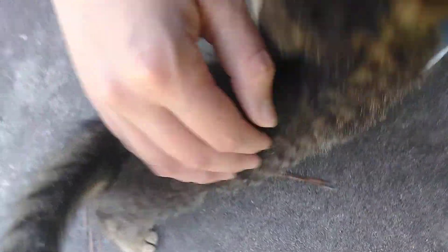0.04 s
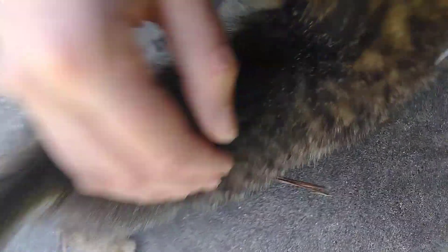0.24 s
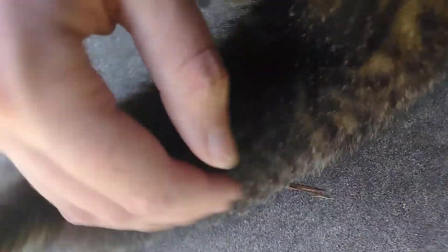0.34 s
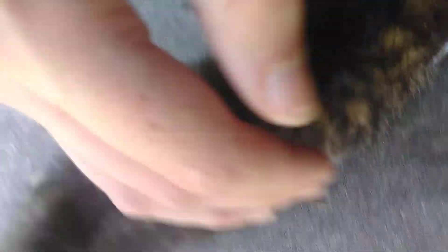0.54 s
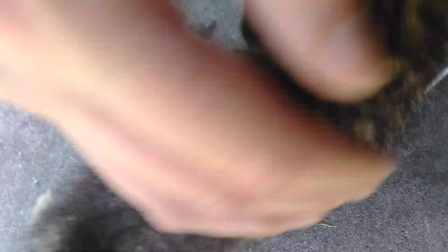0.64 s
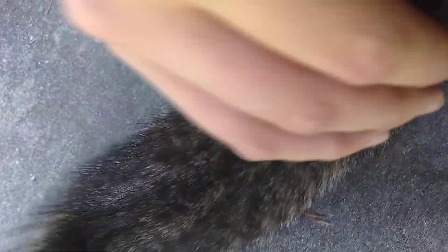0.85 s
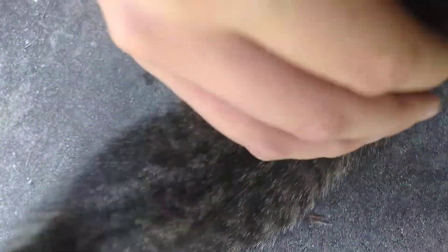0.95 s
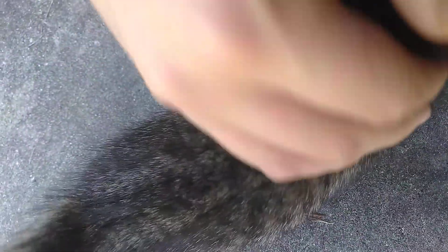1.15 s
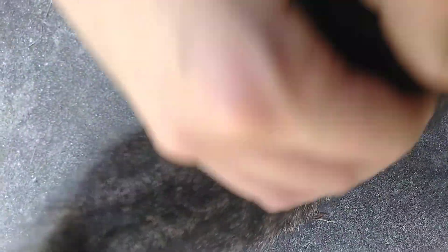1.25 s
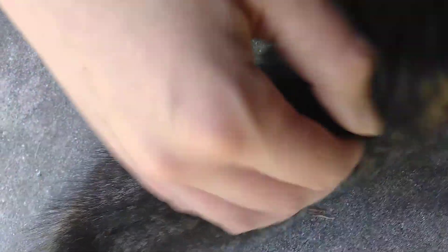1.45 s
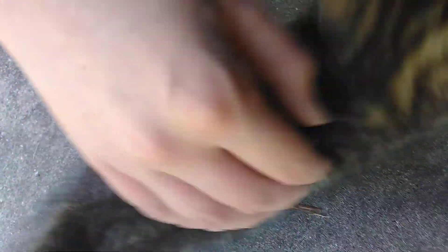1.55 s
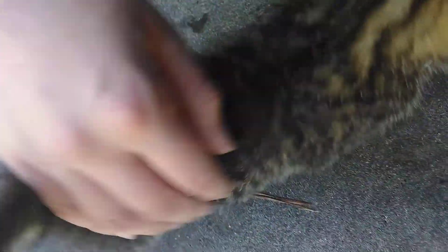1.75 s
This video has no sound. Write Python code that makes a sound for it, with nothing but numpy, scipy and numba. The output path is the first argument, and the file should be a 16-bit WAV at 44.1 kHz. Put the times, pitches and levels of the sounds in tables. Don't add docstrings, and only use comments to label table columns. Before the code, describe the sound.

Fur rubbed by fingers, dry and close, bursts into hissing and sharp ticks in the first half, fades out, then returns as light pats and small handling bumps, with quiet breeze and distant rumble behind.

```python
import sys
import numpy as np
from scipy import signal
from scipy.io import wavfile
from scipy.ndimage import uniform_filter1d
from numba import njit

SR = 44100
rng = np.random.default_rng(int(sys.argv[2]) if len(sys.argv) > 2 else 0)


def volts_from_decibels(level):
    exponent = np.asarray(level, float) / 20
    return 10 ** exponent


def store_wav(level_fs):
    pcm = np.round(np.clip(np.atleast_2d(level_fs), -1, 1) * 32767)
    wavfile.write(sys.argv[1], SR, pcm.T.astype(np.int16))


N = 79380
TOP_HZ = 15800


def level(x, db):
    return x * volts_from_decibels(db) / np.sqrt(np.mean(x ** 2))


@njit
def svf(x, hz, width):
    y, band_state, low_state = np.empty(len(x)), 0., 0.
    for i in range(len(x)):
        g = np.tan(np.pi * hz[i] / SR)
        damping = 2 * np.pi * width / SR / np.sin(2 * np.pi * hz[i] / SR)
        v = (band_state + g * (x[i] - low_state)) / (1 + g * (g + damping))
        band_state = 2 * v - band_state
        low_state = low_state + 2 * g * v
        y[i] = damping * v
    return y


def band(x, hz, width, order=2):
    centre = np.clip(hz * np.ones(N), 10, .45 * SR)
    for _ in range(order):
        x = svf(x + 1e-18, centre, 1. * width)
    return x


def walk(rate):
    hold = int(SR / rate)
    steps = np.repeat(rng.standard_normal(N // hold + 1), hold)
    return 1.3 * uniform_filter1d(uniform_filter1d(steps, hold), hold)[:N]


def grains(per_s, scatter_db):
    hit = rng.random(N) < per_s / SR
    size = np.minimum(rng.exponential(size=N), 3)
    return level(hit * rng.standard_normal(N) * volts_from_decibels(scatter_db * size), 0)


def resonate(x, table, drift, patchy_db, rate, tilt_db=0):
    mid = np.sqrt(table[2][0] * table[-1][0]) if len(table) > 2 else 1
    total, power = 0, 0
    for f, width, db in table:
        gain = volts_from_decibels(db + tilt_db * np.log2(f / mid)) * np.sqrt(width)
        flicker = volts_from_decibels(patchy_db * walk(rate))
        excitation = x * np.sign(rng.standard_normal(N))
        ring = level(band(excitation, f * (1 + drift * walk(12)), 1.5 * width), 0)
        total = total + gain * flicker * ring
        power = power + gain ** 2
    return total / np.sqrt(power)


def air():
    # f/Hz, density/dB per Hz
    air_spectrum = [(21, -30), (35, 2.5), (101, -1), (539, -19), (656, -34.5), (997, -26), (2800, -36.5),
                    (5600, -44.5), (10900, -37.5), (12600, -38.5), (16400, -40.5)]
    f, density_db = np.array(air_spectrum, float).T
    out, swell = 0, walk(3.1)
    for hz in 38 * 2 ** np.arange(0, 9, .5):
        db = np.interp(np.log(hz), np.log(f), density_db) + 0.33 * swell + 1.41 * walk(8)
        out = out + volts_from_decibels(db) * band(rng.standard_normal(N), hz, hz / 1.7)
    low_pass = signal.butter(6, 16000, fs=SR, output="sos")
    return level(signal.sosfilt(low_pass, out), -61)


def breeze():
    # t/s, level/dB
    gusts = [(0, -75), (0.701, -72), (0.85, -75), (1.0, -87), (1.06, -71.5), (1.14, -70), (1.2, -82),
             (1.29, -60.5), (1.42, -79), (1.52, -71.5), (1.6, -90), (1.718, -76)]
    leaves_from_s, leaves_db = 1.18, -83
    s, db = np.array(gusts, float).T
    t = np.arange(N) / SR
    puff = level(band(rng.standard_normal(N), 340 * 2 ** (.15 * walk(12)), 380), 0)
    leaves = level(band(rng.standard_normal(N), 11500, 6000), leaves_db)
    leaves = leaves * np.clip((t - leaves_from_s) / .5, 0, 1)
    return puff * volts_from_decibels(np.interp(t, s, db) + 2.0 * walk(8.1)) + leaves


def hand():
    # t/s, grip on the shell/dB, slip of the fur/dB, coarseness of the slip/dB, grip brightness/dB per octave
    reach = [
        (0, -69.5, -83, -4, -8.5),
        (.056, -78, -83, -2, -5.5),
        (.078, -66, -78, -6, 0),
        (.086, -54, -72, -8, 1),
        (.104, -71, -72, -14, 1.5),
        (.13, -65, -66, -16, 1.5),
        (.157, -59, -58, -14, 1.5),
        (.160, -46, -54, -14, 0),
        (.19, -47.5, -51, -10, -1),
        (.215, -46.5, -54, -3, 2.5),
    ]
    first_stroke = [
        (0.215, -39.5, -57, -1, 0.084),
        (0.24, -41.5, -44.5, -0.9, 0.087),
        (0.268, -39, -38, -0.85, 0.001),
        (0.293, -35.5, -36, -0.78, 0),
        (0.309, -39, -31.5, -1.7, 0),
        (0.33, -46.5, -47.5, -1.2, 0.0056),
    ]
    second_stroke = [
        (0.33, -49.5, -47, -8, -9.5),
        (0.345, -37, -45.5, 1, -2),
        (0.358, -48.5, -52, 0.5, 1),
        (0.378, -33, -51, 7, -2.8),
        (0.412, -57.5, -55.5, -3, 5),
        (0.421, -47.5, -53, 2, 7.5),
        (0.436, -58, -63.5, -4, 0),
        (.447, -64, -65.5, 2, -10),
    ]
    return_stroke = [
        (0.456, -62, -62, -7, 0.3),
        (0.47, -59.5, -60, -7, 0.45),
        (0.484, -50, -54.5, 0, 0.35),
        (0.498, -61, -61, -3.5, 0.3),
        (0.534, -51, -52.5, 1, 0.12),
        (0.555, -58, -49, -15, -0.17),
        (.564, -44.5, -45, 0, -1),
        (0.569, -39.5, -44.5, 1.5, -0.26),
        (0.6, -47, -53.5, 3, -0.45),
    ]
    lift = [
        (0.6, -48.5, -54.5, 1, 0),
        (0.646, -50.5, -59, -1.5, 0),
        (0.69, -72.5, -62, -12, 0),
        (0.757, -72.5, -74, -3.5, 0),
        (0.794, -77.5, -87, 4, 0.0038),
        (0.8, -81, -97, -6, 0),
    ]
    shift = [
        (0.84, -77.5, -92.5, -3, 3),
        (0.866, -81, -86.5, -2.5, 4),
        (.874, -73, -75.5, -0.5, 4.5),
        (0.898, -65.5, -77.5, 2, 5),
        (.907, -80, -75.5, -1, 3),
        (0.96, -98, -98, -10, 2.9),
    ]
    pat = [
        (1.03, -95, -99.5, 4.5, 4),
        (1.056, -85, -81, -9, 5.4),
        (1.062, -79, -70, -9, 5.9),
        (1.075, -73, -62, -21.5, 8.3),
        (1.095, -71.5, -56, -23, 7.3),
        (1.12, -70, -56, -14, 3.1),
        (1.16, -76, -60, -9.5, 3),
        (1.194, -78, -66, -13, 2.3),
        (1.2, -80, -70, -18, 3),
        (1.225, -85, -78, -18, 3),
    ]
    pat_back = [
        (1.226, -91, -80, -12, 3),
        (1.243, -68.5, -70, 0.5, 4),
        (1.26, -62.5, -59.5, -3, 9.9),
        (1.285, -57, -56.5, -13, 4),
        (1.296, -64.5, -59, -8, 4.5),
        (1.308, -60.5, -59.5, -8, 4.4),
        (1.33, -69.5, -66, -9, 2),
        (1.384, -89, -79, -18, 3),
    ]
    settle = [
        (1.385, -74, -79.5, -28, 3),
        (1.415, -71, -77, -1.5, 3.5),
        (1.424, -63, -80, 8, 5),
        (1.439, -62.5, -81.5, 0, 6.1),
        (1.458, -65.5, -79, -9.5, 5.2),
        (1.489, -68.5, -83, -20, 15),
        (1.521, -72, -88.5, -7, 4.7),
        (1.58, -93, -100, -17.5, 5.7),
    ]
    moves = np.vstack([reach, first_stroke, second_stroke, return_stroke, lift, shift, pat, pat_back, settle])
    moves = moves[np.argsort(moves[:, 0], kind="stable")]
    t = np.arange(N) / SR
    return [uniform_filter1d(np.interp(t, moves[:, 0], control), size=90) for control in moves.T[1:]]


def grip(grip_db, bright_db):
    # f/Hz, width/Hz, level/dB
    shell = [(324, 330, -27.5), (470, 85, -12), (754, 290, 2), (1118.5, 150, 3.5), (1500, 1000, -0.5),
             (2100, 500, -1), (2743, 1300, -9.5)]
    # t/s, peak level/dB, f/Hz, t60/s
    knocks = [(.002, -56, 482, 0.083), (0.061, -61, 1500, .01), (.0858, -43, 680, 0.026),
              (.139, -51.5, 1990, 0.017), (.229, -37.5, 1080, .015), (.2405, -32, 2190, 0.028),
              (.2545, -34, 580, 0.038), (0.566, -37, 1740, .015), (.885, -65, 2100, 0.066),
              (0.896, -57, 6800, 0.011), (.901, -62, 7200, 0.013), (1.085, -63.5, 2410, .025),
              (1.1, -54, 5800, 0.016), (1.122, -56.5, 2276, .035), (1.125, -58, 3800, 0.024),
              (1.282, -53, 1080, 0.083), (1.746, -75.5, 10500, .12), (0.196, -49, 1140, 0.03),
              (0.225, -43.5, 80, 0.1), (0.249, -56, 1380, 0.013), (0.373, -41, 366, 0.03),
              (.648, -32, 650, 0.0092), (1.361, -52, 188.5, 0.14), (1.424, -53, 1200, 0.021),
              (1.679, -53.5, 190.4, 0.15), (1.701, -66.5, 1500, 0.024), (1.742, -46, 287, 0.018),
              (1.744, -60, 1810, 0.006)]
    slips = grains(per_s=5000, scatter_db=3)
    creak = resonate(slips, shell, drift=.06, patchy_db=1.5, rate=70, tilt_db=bright_db)
    creak = signal.sosfilt(signal.butter(10, 3400, fs=SR, output="sos"), creak)
    creak = signal.sosfilt(signal.butter(4, 488.4, "high", fs=SR, output="sos"), creak)
    out = creak * volts_from_decibels(grip_db + 1.5 * walk(150))
    t = np.arange(N) / SR
    for s, db, hz, t60 in knocks:
        age = np.maximum(t - s, 0)
        attack = np.minimum(age * hz, 1)
        out = out + volts_from_decibels(db - 60 * age / t60) * np.sin(2 * np.pi * hz * age) * attack
    return out


def snaps():
    # t/s, peak level/dB, broad share/0-1
    ticks = [(.1215, -50, .2), (.3055, -19, .1), (.3065, -17, .2), (.2414, -27, .6), (.2845, -21, .7),
             (.3084, -6.5, .45), (.3688, -31, .5), (.337, -30, .05), (.3783, -20, 1), (.4178, -40, .1),
             (.4207, -25, .4), (.4225, -35, .7), (.431, -28, .6), (.4608, -33, .15), (.4644, -38, .1),
             (.466, -34, .05), (.4677, -25, .12), (.469, -36, .05), (.4758, -30, .12), (.4858, -39, .1),
             (.4943, -37, .3), (.5028, -39, .3), (.5058, -42, .3), (.5085, -43, .3), (.5162, -27, .3),
             (.5353, -33, .2), (.5436, -32, .2), (.657, -39, .5), (1.0995, -38, .3), (1.1015, -42, .3),
             (1.124, -42, .3)]
    port_hz, port_width_hz = 11200, 4800
    ring, broad = np.zeros(N), np.zeros(N)
    for s, db, share in ticks:
        i = int(s * SR)
        ring[i] = -volts_from_decibels(db) * (1 - share)
        broad[i] = -volts_from_decibels(db) * share
    crack_band = signal.butter(2, [1500, 11500], "band", fs=SR, output="sos")
    crack = signal.sosfilt(crack_band, broad)
    return 5.5 * band(np.roll(ring, 1), port_hz, port_width_hz) + 2.6 * crack


def fur(slip_db, coarse_db):
    # f/Hz, width/Hz, level/dB
    fine_bands = [(5900, 1500, -4.5), (8300, 2200, -3), (10700, 2200, 0), (13000, 2400, -9),
                  (15200, 2400, -10.5)]
    # f/Hz, width/Hz, level/dB
    coarse_bands = [(3700, 1100, -0.72), (4800, 4900, -0.015)]
    hairs = grains(per_s=20000, scatter_db=3) * volts_from_decibels(1.5 * walk(200))
    fine = resonate(hairs, fine_bands, drift=0.0063, patchy_db=1.2, rate=47)
    coarse = resonate(hairs, coarse_bands, drift=0.0063, patchy_db=1.2, rate=47)
    return volts_from_decibels(slip_db) * (fine + coarse * volts_from_decibels(coarse_db))


def scene():
    grip_db, slip_db, coarse_db, bright_db = hand()
    mix = air() + breeze() + grip(grip_db, bright_db) + snaps() + fur(slip_db, coarse_db)
    return mix[None]


def gate(x):
    from_hz, step_hz, frame, lead = 12750, 690, 1024, 263
    threshold_db, rise_db, scatter_db = -91.5, -.1, 1.6
    f, _, z = signal.stft(np.pad(x, ((0, 0), (lead, 0))), SR, nperseg=2 * frame)
    for k, hz in enumerate(np.arange(from_hz, TOP_HZ + step_hz, step_hz)):
        bins = (f >= hz) & (f < hz + step_hz)
        rms = np.sqrt(4 / 3 * np.sum(np.abs(z[:, bins]) ** 2, axis=1, keepdims=True))
        threshold = volts_from_decibels(threshold_db + rise_db * k + scatter_db * rng.standard_normal(rms.shape))
        z[:, bins] *= rms > threshold
    return signal.istft(z, SR, nperseg=2 * frame)[1][:, lead:lead + N]


def roll_off(x):
    return signal.sosfilt(signal.butter(12, 16520, fs=SR, output="sos"), x)


def record(dry):
    low_pass = signal.ellip(8, .2, 45, TOP_HZ, fs=SR, output="sos")
    mix = gate(signal.sosfilt(low_pass, dry))
    return roll_off(mix)


dry = scene()
out = record(dry)
store_wav(out)
```